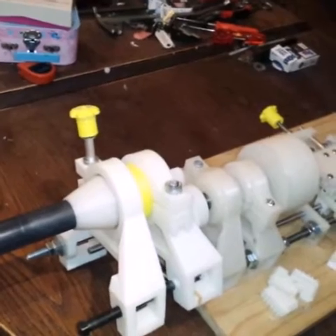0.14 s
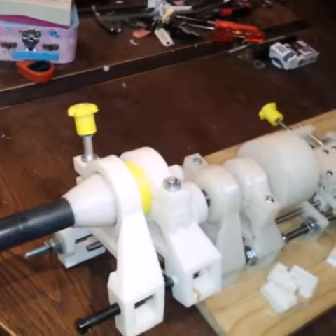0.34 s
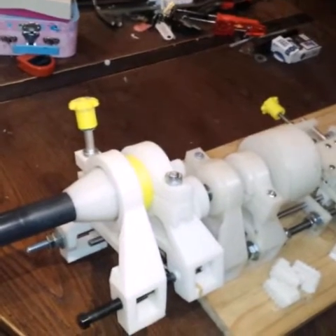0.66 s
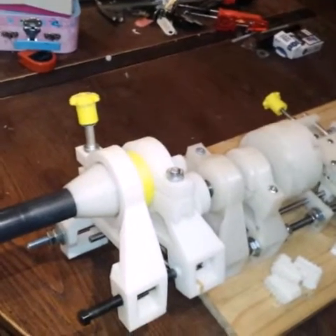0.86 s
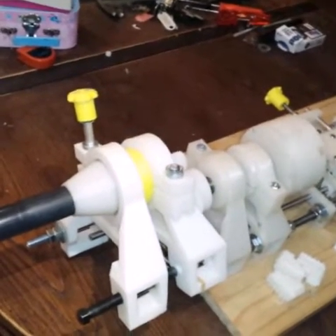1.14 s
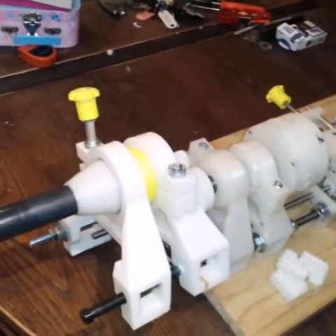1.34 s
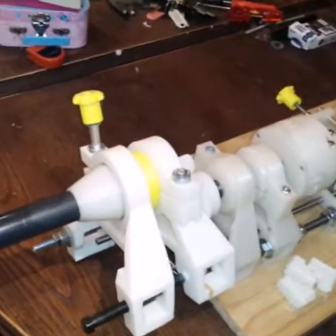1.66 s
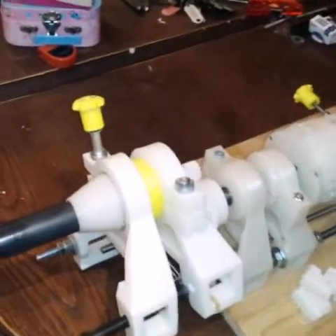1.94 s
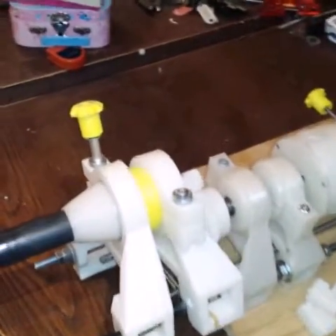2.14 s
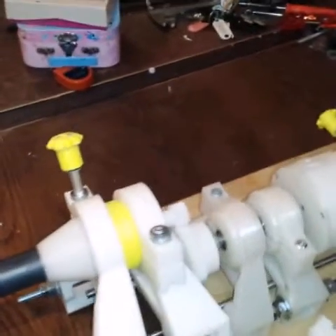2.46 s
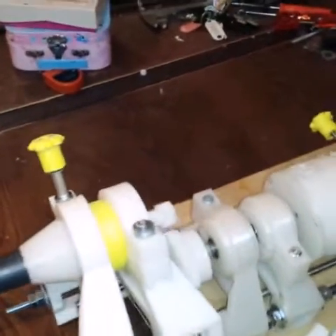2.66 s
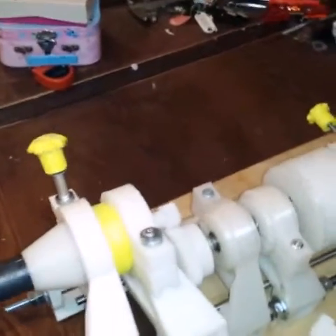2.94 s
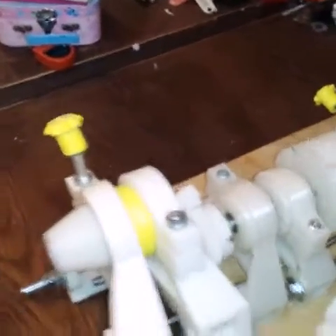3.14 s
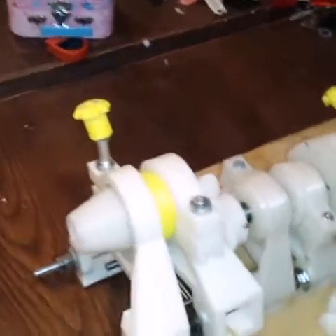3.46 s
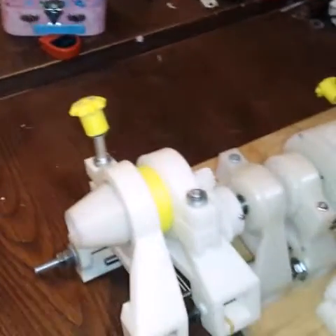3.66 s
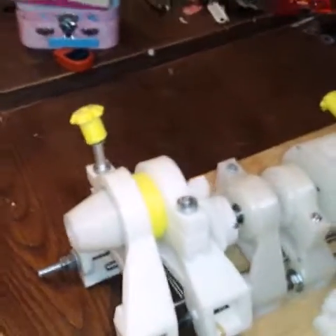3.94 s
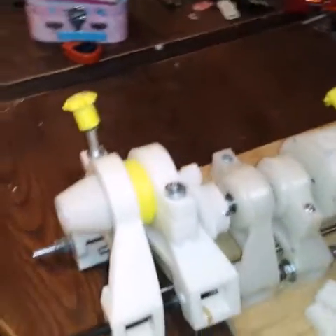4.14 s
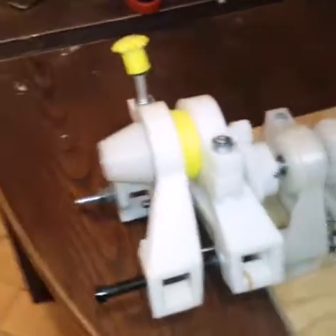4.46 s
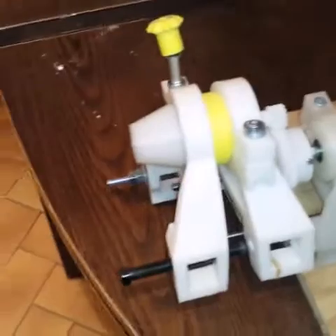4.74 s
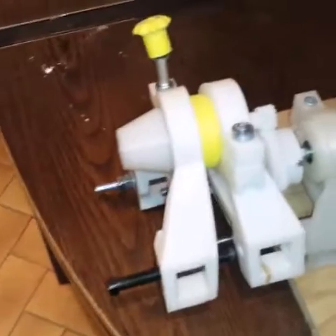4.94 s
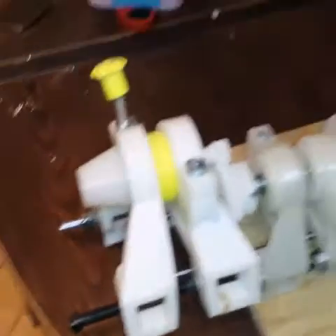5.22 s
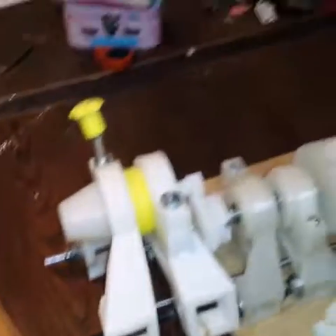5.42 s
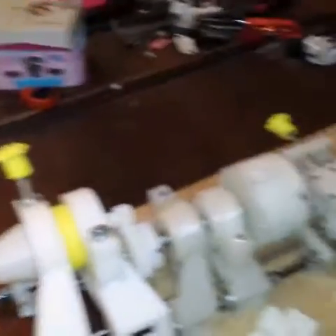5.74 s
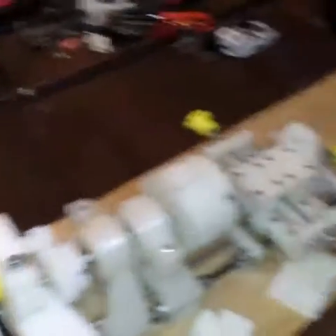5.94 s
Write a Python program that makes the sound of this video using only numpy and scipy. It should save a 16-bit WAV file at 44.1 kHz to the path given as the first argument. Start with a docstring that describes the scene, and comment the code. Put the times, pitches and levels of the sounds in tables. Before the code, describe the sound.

Close, slightly roomy stereo sound of suction at a bench. A constant motor note around 360 hertz sings through tearing air. Nearly three seconds in, the hose comes loose: a rising whistle, two sharp gulps and a thump. The note dips while the freed hose rushes, then both swell closer. At five seconds power is cut; the pitch glides down, beating with room echoes, as the hiss dies first.

```python
"""A vacuum cleaner sucks air through a small plastic turbine on a workbench; its motor sings one strong note.
The air tearing through the turbine is shaped noise; a faint low hum is two wavering sines.
The hose is eased off the turbine's cone with a rising whistle, two gulps of air and a thump of its air column.
Then its open mouth hisses as noise in three bands, and grows louder as it swings toward the microphone.
Near five seconds the cleaner is switched off: note and hiss sink together, the note beating with its echoes."""
import sys
import numpy as np
from scipy import signal
from scipy.fft import rfft, irfft, next_fast_len
from scipy.io import wavfile
from scipy.ndimage import uniform_filter1d, map_coordinates

SR = 44100
rng = np.random.default_rng(int(sys.argv[2]) if len(sys.argv) > 2 else 0)


def transcribe(u):
    """Save the signal u as a 16-bit wav file named by the first command-line argument.

    u: samples, shape (n,) or (channels, n), limited to [-1, 1]; the rate is SR.
    q: integer samples, one column per channel.
    """
    v = np.clip(np.atleast_2d(u).T, -1, 1)
    q = np.round(v * 32767).astype(np.int16)
    wavfile.write(sys.argv[1], SR, q)


N = 268415

# how the turbine's side of the scene differs between ears: (frequency [Hz], left minus right [dB])
TURBINE_SIDE = [(60, -5), (91, 17), (140, -3), (210, -8), (320, 8), (490, 2.5), (740, -0.5), (1130, 0.5),
                (1710, 0.5), (2610, 5.5), (3960, -2), (6030, 1.5), (9160, -3.5), (13900, -10)]
OFF_S = 4.965  # the cleaner is switched off
RELEASE_S = 2.81  # the hose comes free of the cone
FLOW_LAG_S = 0.07  # the airflow slows a little later than the shaft
TONE_FADE_S = 0.013  # whistling tones set in and break off this fast


def amp(db):
    """Turn decibels into gain."""
    return 10 ** (np.asarray(db) / 20)


def unit(x):
    """Scale x to an rms of 1."""
    return x / np.sqrt(np.mean(np.abs(x) ** 2) + 1e-20)


def clock():
    """Give the time of every sample in seconds."""
    return np.arange(N) / SR


def along(points, hz):
    """Read (frequency, value) points between their entries on a log frequency axis."""
    f, value = np.transpose(points)
    return np.interp(np.log(hz + 1), np.log(f + 1), value)


def curves(rows):
    """Draw straight lines through each column after the time: one value per sample."""
    times, *columns = np.transpose(rows)
    return [np.interp(clock(), times, column) for column in columns]


def wobble(rate):
    """Draw a smooth random curve with this many random points a second."""
    points = rng.standard_normal(int(N * rate / SR) + 4)
    return map_coordinates(points, [clock() * rate])


def filtered(x, response):
    """Shape x by a gain, or complex response, for each frequency."""
    m = next_fast_len(N + SR // 2)
    spectrum = rfft(x, m) * response(np.fft.rfftfreq(m, 1 / SR))
    return irfft(spectrum, m)[..., :N]


def split(x, edge_hz):
    """Split x into the parts below and above an edge."""
    low = filtered(x, lambda hz: 1 / (1 + (hz / edge_hz) ** 6))
    return low, x - low


def until(s, fade_s):
    """Fall smoothly in gain from 1 to 0 around time s."""
    return .5 - .5 * np.tanh((clock() - s) / fade_s)


def between(start_s, end_s, fade_s):
    """Hold a gain of 1 from start to end, with smooth edges."""
    return (1 - until(start_s, fade_s)) * until(end_s, fade_s)


def lift(modes, hz):
    """Add up the dB that (frequency [Hz], width [Hz], lift [dB]) resonances give at each frequency."""
    return sum(db / (1 + (2 * (hz - centre) / width) ** 2) for centre, width, db in modes)


def spin(lag_s=0):
    """Share of full speed: 1 under power, then braked by air drag, which goes with speed squared."""
    half_speed_s = 1.17  # time of coasting down to half speed
    coasting_s = np.maximum(clock() - OFF_S - lag_s, 0)
    return 1 / (1 + coasting_s / half_speed_s)


def sine(hz):
    """Make a complex tone that follows a pitch curve."""
    return np.exp(2j * np.pi * np.cumsum(hz) / SR)


def panned(pair, balance):
    """Make left and right differ in level by a balance that depends on frequency."""
    return filtered(pair, lambda hz: amp(along(balance, hz) * np.array([[.5], [-.5]])))


def ports(direct, diffuse, lag_ms):
    """Direct treble reaches the right microphone port first; the room's share differs at each port."""
    # how alike left and right are: (frequency [Hz], likeness [0-1])
    alike = [(50, .7), (300, .85), (600, .6), (1200, .5), (3000, .45), (8000, .6), (14000, .55)]
    sides = np.array([[1], [-1]])

    def delay(hz):
        treble = 1 - 1 / (1 + (hz / 680) ** 8)
        return np.exp(-1j * np.pi * hz * treble * lag_ms * sides / 1000)

    shared = filtered(direct, lambda hz: np.sqrt(along(alike, hz)) * delay(hz))
    separate = filtered(diffuse, lambda hz: np.sqrt(1 - along(alike, hz)))
    return shared + separate


def rush(spectrum, modes, balance, patchy_db, lag_ms):
    """Turbulent air: stereo noise of rms 1 with resonances and drifting patches of gain."""
    z = signal.stft(rng.standard_normal((3, N)), nperseg=512)[2]
    # smoothing over neighbouring frequencies and times turns random gains into patches
    patches = uniform_filter1d(rng.standard_normal(z.shape[1:]), size=5, axis=0)
    patches = unit(uniform_filter1d(patches, size=30, axis=1))
    air = signal.istft(z * amp(patchy_db * patches), nperseg=512)[1][:, :N]
    air = filtered(air, lambda hz: amp(along(spectrum, hz) + lift(modes, hz)))
    return unit(panned(ports(air[0], air[1:], lag_ms), balance))


def edge_tone(tone, width_hz, lag_ms):
    """Turbulence blurs a complex tone into a stereo resonance of the same strength."""
    noise = rng.standard_normal((2, 3, N))
    a, b = unit(filtered(noise, lambda hz: 1 / (1 + (hz / width_hz) ** 2)))
    air = np.real((a + 1j * b) * tone)
    return panned(ports(air[0], air[1:], lag_ms), TURBINE_SIDE)


def flow_tones(rows):
    """Each tone sets in, glides and breaks off; its pitch goes with the airflow."""
    flow = spin(FLOW_LAG_S)
    total = 0
    for start, end, first_hz, last_hz, db in rows:
        pitch = flow * np.interp(clock(), [start, end], [first_hz, last_hz])
        total = total + amp(db) * between(start, end, TONE_FADE_S) * sine(pitch)
    return total


def in_room(tone, wet_db, t60):
    """After switch-off a complex tone gains echoes, at even strength: as it glides, they beat with it."""
    t = np.arange(SR // 2) / SR
    tail = rng.standard_normal(len(t)) * amp(-60 * t / t60)
    padded = np.pad(tone, (len(t), 0), mode="constant")
    echo = signal.fftconvolve(padded, tail / np.linalg.norm(tail))[len(t):][:N]
    heard = tone + amp(wet_db) * echo * (1 - until(OFF_S, 0.05))
    power = np.abs(uniform_filter1d(np.abs(heard) ** 2, size=SR // 5))
    return heard / np.sqrt(power + 1e-9)


def hum(hum_db=-48, waver_db=3, octave_db=-48):
    """A low hum wavers, swells and dips, with a steadier octave above it."""
    # swells and dips of the low hum: (middle [s], time to shrink to about a third [s], change [dB])
    hum_swells = [(0.297, .06, 14), (2.65, 0.6, -2), (3.4, 0.7, -5), (4.908, .11, 11), (5.3, .08, 8),
                  (5.8, 0.23, -16)]
    turn = 2 * np.pi * 100.4 * clock()  # pitch in Hz
    swell_db = sum(db * np.exp(-((clock() - s) / half_s) ** 2) for s, half_s, db in hum_swells)
    low = amp(hum_db + swell_db + waver_db * wobble(14)) * np.sin(turn + 0.32 * wobble(9))
    octave = amp(octave_db + 1.0 * wobble(7.9)) * np.sin(2 * turn + 0.87 * wobble(10))
    return np.sqrt(2) * (low + octave)


def turbine(rush_db=-23, hiss_db=-21, drift_db=0.24, loose_s=1.63, loose_db=1):
    """Air tears through the turbine's vanes, a little louder once the hose is loosened on the cone."""
    # spectrum of the air in the vanes: (frequency [Hz], relative level per Hz [dB])
    turbine_air = [(25, -32), (70, -10.5), (130, -7.5), (270, -0.5), (520, -0.5), (850, -1.5), (1600, 2.5),
                   (2200, 4.5), (3700, -0.5), (5400, 1.5), (7300, -4.5), (9500, -3.5), (11700, -3.5),
                   (14400, -7.5)]
    # cavities of the turbine's housing: (frequency [Hz], width [Hz], lift [dB])
    cavities = [(1280, 350, 2.5), (2810, 75, 4), (4440, 400, 2), (4770, 150, 3), (6430, 490, 3.5),
                (8280, 1300, 9), (9260, 480, 5.5)]
    air = rush(turbine_air, cavities, TURBINE_SIDE, patchy_db=1.1, lag_ms=0.2927)
    body, top = split(air, edge_hz=4920)
    air = amp(rush_db) * unit(body) + amp(hiss_db) * unit(top)
    level_db = drift_db * wobble(7.12) + loose_db * (1 - until(loose_s, .06))
    return air * amp(level_db) * until(RELEASE_S, 0.01)


def release(leak_db=-21, widest_s=2.61, grow_db_per_s=20):
    """A leak grows as the gap widens, then eases; two gulps break the seal and the hose's air column thumps."""
    # gulps as the hose lets go: (start [s], level [dB], time to fall 60 dB [s])
    gulps = [(2.668, -13.5, .24), (2.749, -15.5, .15)]
    # thump of the freed air column: (start [s], pitch [Hz], level [dB], time to fall 60 dB [s])
    thump_row = (2.768, 310, -21, .3)
    # spectrum of leak and gulps: (frequency [Hz], relative level per Hz [dB])
    gulp_air = [(100, -40), (600, -29), (950, 0), (1900, 5.5), (3300, 3), (4500, 0.5), (6000, 2),
                (11000, -10), (13000, -25), (14500, -29)]
    # resonances of the widening gap between hose and cone: (frequency [Hz], width [Hz], lift [dB])
    gap_modes = [(1400, 200, 2), (2940, 240, 7), (4370, 270, 8.5), (4900, 340, 9.5), (9380, 380, 7),
                 (11600, 900, 4)]

    def blow(start_s, t60, rise_s):
        age = np.maximum(clock() - start_s, 0)
        return amp(-60 * age / t60) * (1 - np.exp(-age / rise_s))

    leak = amp(leak_db - grow_db_per_s * np.abs(clock() - widest_s))
    leak = leak * between(2.25, RELEASE_S + 0.016, 0.072)  # the hose starts to leave the cone
    flow = leak + sum(amp(db) * blow(s, t60, 0.0019) for s, db, t60 in gulps)
    s, hz, db, t60 = thump_row
    thump = amp(db) * blow(s, t60, 0.013) * np.sin(2 * np.pi * hz * (clock() - s))
    air = rush(gulp_air, gap_modes, TURBINE_SIDE, patchy_db=1, lag_ms=0.285)
    return flow * air + np.sqrt(2) * thump


def whistles(gap_db=-26.5, swell_db_per_s=70, breathy=.35, bend=1.4):
    """Airy tones sound at the hose's rim and in its pipe; a clearer whistle rises in the opening gap."""
    # air shearing over the rim jumps from tone to tone:
    # (start [s], end [s], first pitch at full flow [Hz], last pitch at full flow [Hz], level [dB])
    rim_tones = [(-.1, 1.1, 14300, 14300, -31), (1.67, 1.72, 13500, 10300, -24),
                 (1.715, 2.0, 9800, 9630, -23.5), (2.0, 2.18, 8500, 8600, -22),
                 (2.18, 2.45, 11900, 11800, -27), (2.27, 2.46, 9300, 10760, -25),
                 (2.45, 2.8, 12000, 10870, -29.5), (2.8, 3.45, 7350, 6850, -32.5),
                 (3.45, 3.9, 6680, 7210, -27), (4.5, 5.06, 5233, 5284, -27.5),
                 (5.07, 5.48, 4570, 4640, -26.5), (5.48, 5.83, 4780, 4735, -26)]
    # narrow pipe tones in the hose, same columns:
    # (start [s], end [s], first pitch at full flow [Hz], last pitch at full flow [Hz], level [dB])
    pipe_tones = [(4.52, 4.72, 5300, 5480, -29), (4.82, 5.06, 5520, 5300, -28.5),
                  (4.97, 5.09, 2620, 2600, -30)]
    rim = edge_tone(flow_tones(rim_tones), width_hz=480, lag_ms=0.314)
    pipe = edge_tone(flow_tones(pipe_tones), width_hz=48, lag_ms=0.36)

    start_s, loudest_s, end_s = 2.4, 2.59, 2.69
    first_hz, last_hz = 690, 1450
    opening = np.clip(clock(), start_s, end_s) - start_s
    closed = np.clip(1 - opening / (end_s - start_s), 0, 1)
    gap_hz = last_hz - (last_hz - first_hz) * closed ** bend
    strength = amp(gap_db - swell_db_per_s * np.abs(clock() - loudest_s))
    strength = strength * between(start_s, end_s, TONE_FADE_S)
    jet = sine(gap_hz * (1 + .012 * wobble(90))).imag * amp(1.5 * wobble(60))
    breath = edge_tone(sine(gap_hz), width_hz=58, lag_ms=0.07)
    gap = strength * (np.sqrt(2) * jet + breathy * breath)
    return rim + pipe + gap


def hose(unsteady_db=1.0):
    """The free hose sucks air over a roaring exhaust, louder as it swings near; its hiss dies first."""
    # spectrum of the hose's air: (frequency [Hz], relative level per Hz [dB])
    hose_air = [(25, -25), (70, -10), (140, -1.5), (280, 5), (600, 4.5), (1050, 7), (1600, -2), (2400, -2),
                (3500, -3.5), (5200, -1), (6700, -7), (8200, -3.5), (9700, -1), (14000, -15)]
    # resonances of the open hose mouth: (frequency [Hz], width [Hz], lift [dB])
    hose_modes = [(2640, 300, 0.5), (4810, 290, -2.5), (6960, 1200, 10.5), (9750, 800, 6)]
    # left-right difference of the hose: (frequency [Hz], left minus right [dB])
    hose_side = [(60, 0.0), (91, -7), (140, 2), (210, -4.5), (320, 3.5), (490, 2.5), (740, -0.5), (1130, 1),
                 (1710, 2.5), (2610, 7.5), (3960, -1.5), (6030, -1.5), (9160, 0.5), (13900, -16.5)]
    # roar, rush and hiss, one row each:
    # (level [dB], change while turned away [dB], surge at release [dB], power of the airflow [no unit])
    hose_bands = [(-27.5, -8, 11, -.3), (-20.5, -8, 11.5, 1.01), (-28, -6, 5, 3)]
    air = rush(hose_air, hose_modes, hose_side, patchy_db=1.8, lag_ms=0.356)
    roar, rest = split(air, edge_hz=1310)
    body, hiss = split(rest, edge_hz=6400)
    away = until(3.79, 0.25)  # the mouth swings toward the microphone
    flow = spin(FLOW_LAG_S)
    surge = np.exp(-np.maximum(clock() - RELEASE_S, 0) / 0.046)  # dies away within a moment
    total = 0
    for band, (db, away_db, surge_db, law) in zip([roar, body, hiss], hose_bands):
        total = total + unit(band) * amp(db + away_db * away + surge_db * surge) * flow ** law
    return total * amp(unsteady_db * wobble(8)) * (1 - until(RELEASE_S, 0.0097))


def motor(shade_share=0.56, note_db=0.02, flutter_db=0.48, lag_turn=0.088):
    """The unbalanced shaft sings; coasting, it fades through the room's modes and overtones rattle up."""
    # motor shaft under power: (time [s], speed [turns a second])
    shaft_speed = [(0, 365.8), (.15, 365.4), (.55, 363.9), (2.1, 363.3), (2.75, 363.7), (3.2, 361.5),
                   (3.65, 360.5), (4.3, 360.9), (4.97, 361.2)]
    # the note under power, before trim and flutter: (time [s], level [dB], left minus right [dB])
    note_levels = [(0.0, -11.5, 2.5), (0.08, -12, 3), (0.26, -12, 2.0), (1.7, -11, 1.5), (2.03, -12.5, 0.5),
                   (2.26, -12, 0.0), (2.64, -14.5, 0.0), (2.67, -20, -0.5), (2.86, -15.5, 0),
                   (3.5, -20.5, -0.5), (3.96, -13, -1.5), (4.19, -11, -0.5), (4.97, -12, -0.5)]
    # overtones of the shaft: (multiple [no unit], level at the note's loudest [dB], extra while coasting [dB])
    orders = [(2, -47.5, 14), (3, -47, 10), (5, -58, 12), (6, -50, 0), (12, -52, 0)]
    # room resonances that the sinking note sweeps through: (frequency [Hz], width [Hz], lift [dB])
    room_modes = [(329, 9.5, 5.5), (286, 14, 7), (252, 9.6, 5.5), (198, 7, 11.5)]
    speed = curves(shaft_speed)[0] * spin()
    turn = 2 * np.pi * np.cumsum(speed) / SR
    level_db, pan_db = curves(note_levels)
    powered = until(4.99, 0.013)
    # the coasting note falls with a power of the speed
    fading_db = -19 + 2.8 * 20 * np.log10(spin()) + lift(room_modes, speed)
    level_db = powered * level_db + (1 - powered) * fading_db
    note = in_room(np.exp(1j * turn), wet_db=-1, t60=.6)
    note = note * amp(level_db + note_db + flutter_db * wobble(25.13))
    sides = np.array([[1], [-1]])
    # lag_turn shifts each side's phase, in radians
    out = np.real(note * np.exp(-1j * lag_turn * sides)) * amp(sides * pan_db / 2)
    shade_db = shade_share * powered * (level_db - level_db.max())  # overtones dim with the note
    coasting = 1 - until(5.26, 0.22)
    for k, db, coast_db in orders:
        for side in range(2):
            shaky_turn = turn + (.1 + .15 * coasting) * wobble(30)
            overtone = in_room(np.exp(1j * k * shaky_turn), wet_db=-1, t60=.45)
            overtone_db = db + shade_db + coast_db * coasting + 1.3 * wobble(3.95)
            out[side] += overtone.real * amp(overtone_db)
    return np.sqrt(2) * out


def scene():
    """Add up the hum, the moving air and the motor at the two microphone ports."""
    return hum() + turbine() + release() + whistles() + hose() + motor()


def record(dry):
    """Round off the highest peaks and keep nothing from the band limit upward."""
    rounded = dry / (1 + np.abs(dry / .97) ** 12) ** (1 / 12)
    return filtered(rounded, lambda hz: hz < 14570)


dry = scene()
out = record(dry)
transcribe(out)
```